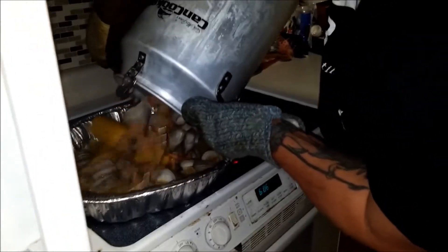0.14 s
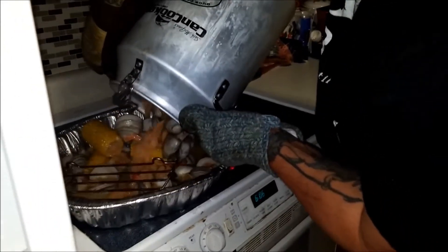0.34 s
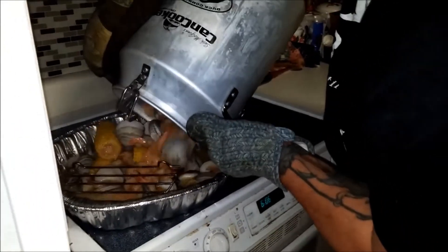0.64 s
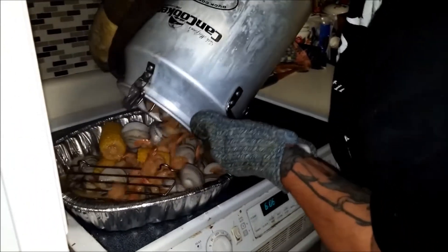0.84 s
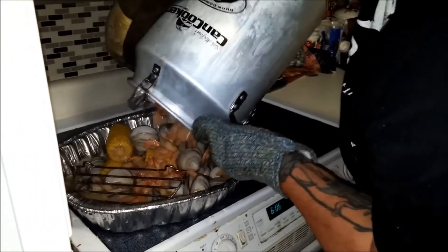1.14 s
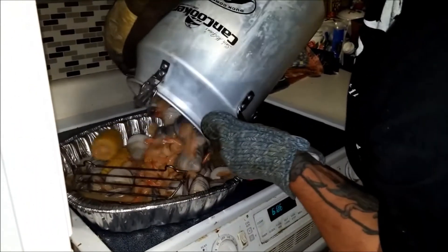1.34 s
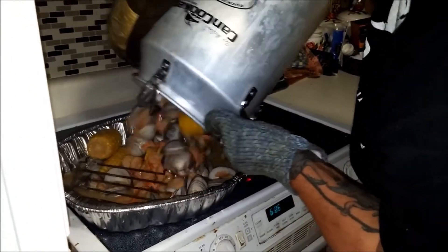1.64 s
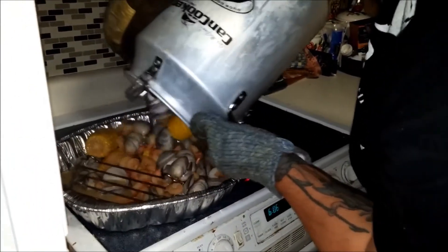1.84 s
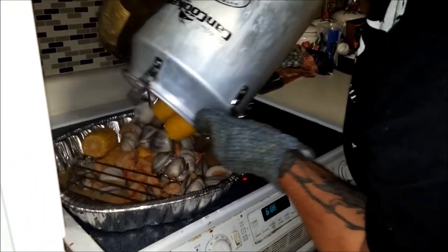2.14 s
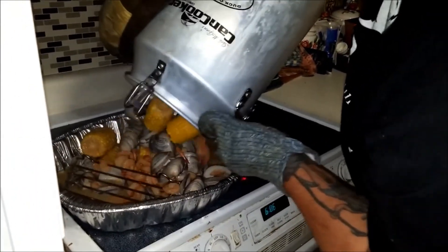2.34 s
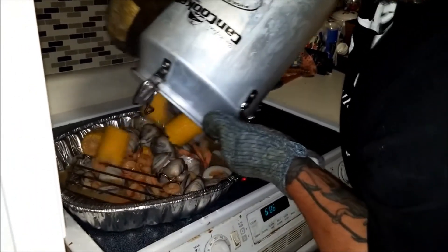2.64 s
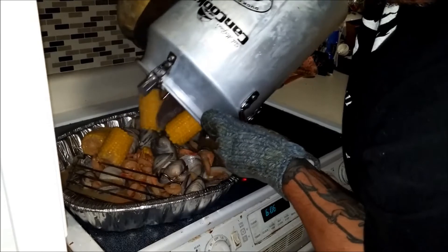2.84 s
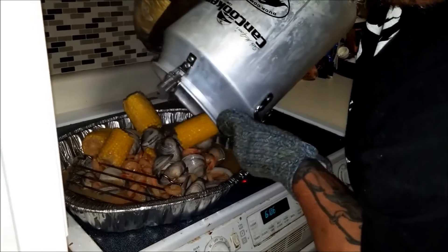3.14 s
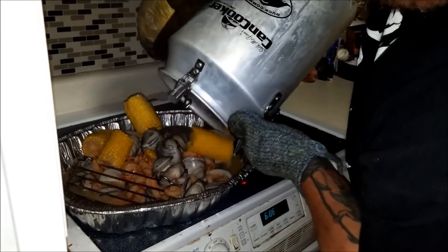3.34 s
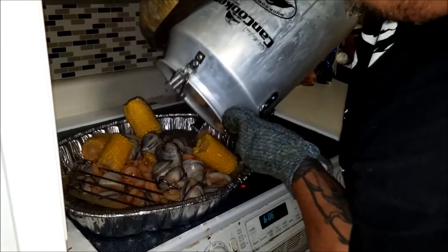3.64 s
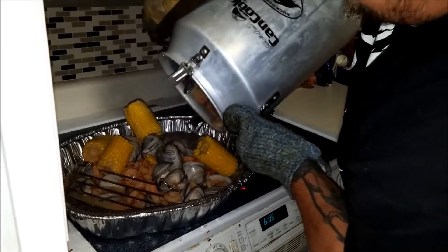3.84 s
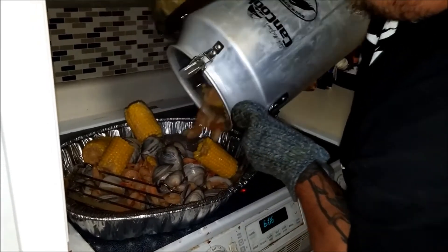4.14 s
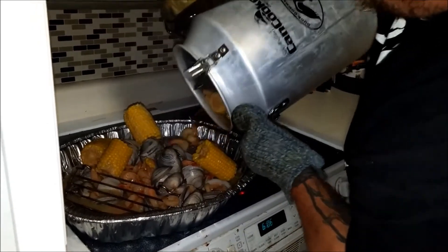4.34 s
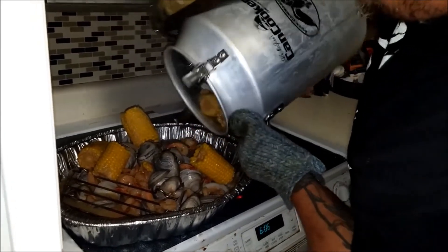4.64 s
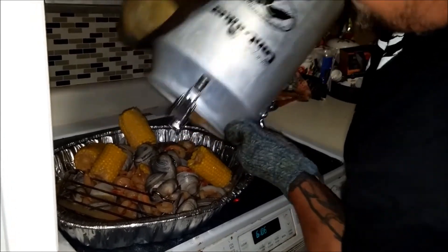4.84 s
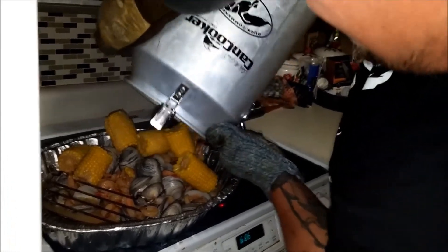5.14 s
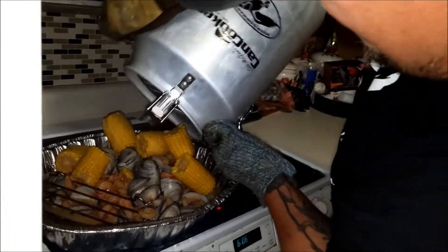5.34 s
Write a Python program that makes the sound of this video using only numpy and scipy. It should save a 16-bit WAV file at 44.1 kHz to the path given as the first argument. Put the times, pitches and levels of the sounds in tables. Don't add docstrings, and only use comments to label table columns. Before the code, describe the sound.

In a small kitchen, heard close up in stereo, a wet load of clams and corn tumbles from an aluminium pot into a foil pan. It opens with a dense rush of broth and shells, continues in uneven knocks and clacks, thins to a near lull before four seconds, then bursts into loud ringing clanks and a last spill.

```python
import sys
import numpy as np
from scipy import signal
from scipy.fft import rfft, irfft
from scipy.io import wavfile
from scipy.ndimage import uniform_filter1d

SR = 44100
rng = np.random.default_rng(int(sys.argv[2]) if len(sys.argv) > 2 else 0)


def invert_db(x):
    u = np.asarray(x, float) / 20
    return 10 ** u


def pcm_store(signal):
    levels = np.round(np.clip(np.atleast_2d(signal), -1, 1) * 32767)
    wavfile.write(sys.argv[1], SR, levels.astype(np.int16).T)


N = 242550
PADDED = 2 ** 18
HZ = np.fft.rfftfreq(PADDED, 1 / SR)

# [t/s, level/dB, f/Hz]
CLANKS = [(0.715, -21, 1770), (1.117, -16.5, 1770), (1.5661, -13.5, 1652), (1.688, -15, 1830),
          (1.744, -11.5, 1860), (1.834, -29, 1670), (2.0075, -28, 1813), (2.073, -25, 1770),
          (2.365, -33, 1700), (2.78, -18, 1870), (3.067, -16.5, 1686), (3.3743, -26, 1720),
          (3.463, -5.5, 1715), (3.9745, -9.5, 1733), (4.1408, 6, 1786), (4.3017, 2.5, 1670),
          (4.821, -13.5, 1762), (4.982, 2, 1642), (5.022, 5, 1790), (5.1697, -12, 1730)]


def on_hz(table):
    hz, value = np.transpose(table)
    return np.interp(np.log(HZ + 1), np.log(hz), value)


def unit(x):
    return x / np.sqrt(np.sum(x ** 2) / len(x))


def decay(t, t60):
    return np.exp(-np.log(1000) * t / t60)


def fade(t60, seconds):
    return decay(np.arange(int(seconds * SR)) / SR, t60)


def pair(colour, shape):
    # [f/Hz, likeness 0-1]
    likeness = [(60, 0.92), (130, 1), (290, 0.86), (640, 0.71), (1410, 0.06), (3100, 0.18), (6820, 0),
                (15000, 0.13)]
    mid, side = rfft(rng.standard_normal((2, N)) * shape, PADDED)
    alike = np.clip(on_hz(likeness), 0, 1)
    mid = mid * np.sqrt(1 + alike)
    side = side * np.sqrt(1 - alike)
    both = irfft(colour * np.array([mid + side, mid - side]), PADDED)[:, :N]
    return both / np.sqrt(2 * np.mean(colour ** 2))


def held(rate, rows):
    k = int(SR / rate)
    steps = np.repeat(rng.standard_normal((rows, N // k + 1)), k, axis=1)[:, :N]
    return 1.15 * uniform_filter1d(steps, k // 2)


def contacts(rate, scatter_db, shape, first=0):
    size_chance, sign_chance, when_chance = rng.random((3, len(shape)))
    size = invert_db(np.minimum(-scatter_db * np.log(size_chance + 1e-9), 30)) * np.sign(sign_chance - 0.5)
    clicks = size * (when_chance < rate / SR) * shape
    clicks[0] += first
    return clicks / np.sqrt(np.sum(clicks ** 2))


def crowd(drive, lo_hz, hi_hz, t60, tail_db, tail_t60):
    # [f/Hz, level/dB per Hz]
    overtones = [(21, -54), (35, -9.5), (111, -18), (171, 6.5), (279, -17), (543, -21), (1060, -12.5),
                 (1330, -17), (1770, -9.5), (3180, -21), (4110, -17), (9580, -16), (11800, -29.5),
                 (15800, -40.5)]
    power = 0
    for db, seconds in ((0, t60), (tail_db, tail_t60)):
        keep = np.exp(-2 * np.log(1000) / (seconds * SR))
        power = power + invert_db(2 * db) * signal.lfilter([1 - keep], [1, -keep], drive ** 2)
    band = np.sqrt((1 + (lo_hz / (HZ + 1)) ** 8) * (1 + (HZ / hi_hz) ** 8))
    return pair(invert_db(on_hz(overtones)) / band, np.sqrt(power))


def ring(drive, modes, place_db, lag_s, lo_hz, hi_hz):
    out = np.zeros((2, N))
    walk = held(25.0, len(modes))
    weights = invert_db(place_db * np.minimum(walk, 1))
    detunes = 0.013 * walk[:, ::-1]
    for (hz, db, t60), weight, detune in zip(modes, weights, detunes):
        turn = np.exp(2j * np.pi * hz / SR * np.cumsum(1 + detune))
        keep = np.exp(-np.log(1000) / (t60 * SR))
        gain = invert_db(db) * np.sqrt(1 - keep ** 2)
        tone = turn * signal.lfilter([gain], [1, -keep], drive * weight * turn.conj())
        lag = lag_s * rng.standard_normal((2, 1))
        out += (tone * np.exp(2j * np.pi * hz * lag)).imag
    return signal.sosfilt(signal.butter(2, [lo_hz, hi_hz], "band", fs=SR, output="sos"), out)


def clack(hz, t60, spread, glide=0):
    t, glide_s = np.arange(2048) / SR, 0.003
    chance = rng.standard_normal((4, 3))
    pitch = np.minimum(hz * (1 + spread * chance[:, :1, None]), 15000.0)
    bent = t + glide * glide_s * (1 - np.exp(-t / glide_s))
    modes = np.sum(np.sin(2 * np.pi * pitch * bent + chance[:, 1:, None] * 2), axis=0)
    return unit(modes * np.minimum(hz * t, 1) * decay(t, t60))


def strike(table, bounce_t60, first, tone_db, tone_t60, trim_db, glide=0):
    drive, tones = np.zeros((len(trim_db), N + SR)), np.zeros((2, N + SR))
    for s, *db, hz in table:
        i = int((s - 0.001) * SR)
        blow = contacts(1200.0, 3.8, fade(bounce_t60, 0.1), first)
        drive[:, i:i + len(blow)] += invert_db(np.array(db) + trim_db)[:, None] * blow
        tone = signal.fftconvolve(clack(hz, tone_t60, 0.06, glide), blow[None])
        tones[:, i:i + tone.shape[1]] += invert_db(db[-1] + tone_db) * tone
    return drive[:, :N], tones[:, :N]


def patter(surges, rise_db_s, fall_db_s, rates, surge_db):
    t, step = np.arange(0, N + 64, 64) / SR, np.arange(N) / 64
    late = t - np.array(surges)[:, :1]
    shape = invert_db(np.where(late < 0, rise_db_s * late, -fall_db_s * late))
    coarse = np.sqrt(invert_db(np.array(surges)[:, 1:].T) ** 2 @ shape ** 2)
    level = np.array([np.interp(step, np.arange(len(t)), row) for row in coarse])
    level = level * invert_db(surge_db * held(40.0, len(level)))
    return level * np.sqrt(N) * np.array([contacts(rate, 2.85, np.ones(N)) for rate in rates])


def small_shells(drive, count, lo_hz, hi_hz, t60):
    out = np.zeros((2, N + SR))
    loud = np.sqrt(uniform_filter1d(drive ** 2, size=900) + 1e-12)
    for place, pitch, size in rng.random((count, 3)):
        i = int(place * N)
        tone = clack(lo_hz * (hi_hz / lo_hz) ** pitch, t60, 0.042)
        out[:, i:i + tone.shape[1]] += loud[i] * size ** 2 * tone
    return out[:, :N]


def touches(rows, spread, glide, glide_s, rise_cycles, alike):
    out, t = np.zeros((2, N + SR)), np.arange(SR // 8) / SR
    bent = t + glide * glide_s * (1 - np.exp(-t / glide_s))
    for (s, db, hz, t60), chance in zip(rows, rng.standard_normal((len(rows), 3, 3))):
        pitch = hz * (1 + spread * np.array([-1, 0, 1]) * abs(chance[0]))
        pitch = np.minimum(pitch, 15500)[:, None, None]
        phase = (1 - alike) * chance.T[:, 1:, None] * 2
        tone = np.sin(2 * np.pi * pitch * bent + phase).sum(axis=0) / 2
        shape = np.minimum(hz * t / rise_cycles, 1) * decay(t, max(t60, 0.005))
        i = int((s - 0.001) * SR)
        out[:, i:i + len(t)] += invert_db(db) * shape * tone
    return out[:, :N]


def knocks():
    # [t/s, blow level/dB, weight/dB (boom), hardness/dB (clack)]
    landings = [(0.1041, -4.5, -35, 0), (0.2088, -2, -20, -9), (0.2301, -1, -24, -18),
                (0.3062, -18.5, -15, 8), (0.348, -3.5, -28, -11.5), (.443, -21.5, -21, 2),
                (0.6387, -8.5, -17, -16), (0.6757, -15, -27, -25), (.77, -12, -10, -7),
                (0.8921, -3.5, -14.5, -13), (0.9738, -10.5, -20, -1.5), (1.0826, -11.5, -4, -2),
                (1.256, -9, -14.5, -10.5), (1.4552, -15, -22, -9), (1.6752, -6, -16, -2.5),
                (2.2179, -7, -16.5, -8.5), (2.276, -14.5, -16, -2.5), (2.343, -18.5, -28, 0),
                (2.364, -15.5, -12, -1), (2.609, -8, -27, -2.5), (2.6841, -17.5, -25, -9),
                (2.722, -15.5, -14.5, -12), (2.7817, -10.5, -24, -15.5), (3.464, -8, -12, -4.5),
                (4.0209, -17.5, -4.5, -2.5), (4.128, -32.5, 18, 10), (4.143, -3.5, -9, 4.5),
                (4.3012, -24, -27, -20), (4.5617, -11, -7, -20), (4.6378, -12.5, -9, -5)]
    # [t/s, blow level/dB, weight/dB, hardness/dB]
    bumps = [(0.0677, -6, -29, -4), (0.147, -4.5, -32, -2), (0.7142, -6, -19.5, -13),
             (1.0021, -8, -12, -10.5), (1.114, -23, -10, 2), (1.3673, -14.5, -20, -7.5),
             (1.564, -11, -6, -5), (1.7354, -14, -3.5, -11), (1.8337, -1.5, -22.5, -11.5),
             (1.935, -8, -46, -6), (2.007, -8.5, -24, -9), (2.0539, -7.5, -9, -23), (2.0715, 0, -25, -19),
             (2.097, -0.5, -18.5, -15.5), (2.146, -11.5, -27, -12), (2.1913, -10, -20, -28),
             (2.4944, -9.5, -33, -3.5), (2.9635, -21, -15, -12), (3.0661, -17.5, -6, -12),
             (3.1339, -0.5, -27, -10.5), (3.2178, -12, -35, -6), (3.283, -19, -11, -26),
             (3.5044, -24.5, -28, -16), (4.2802, -13, -10, -22), (4.82, -15, -15, -0.5),
             (4.9624, -12, -13, -6), (4.982, 4.5, -20.5, -10), (5.0196, 2, -13.5, -6.5),
             (5.0732, -7.5, -25, -25), (5.1653, 1.5, -21, -4.5)]
    # [t/s, blow level/dB, weight/dB]
    taps = [(2.92, -36.5, 3), (0.703, -14, -22), (3.67, -24, -12), (1.2327, -49, -22), (1.345, -19.5, -15),
            (1.4107, -17, -23), (1.549, -23, -19), (2.82, -30, -29), (3.047, -35, -14), (3.256, -25, -10),
            (3.3067, -15.5, -15.5), (3.3273, -35, -18), (3.434, -22.5, -17), (3.538, -16.5, -32),
            (3.5735, -17.5, -9.5), (3.805, -34.5, -1), (3.9439, -21.5, -9.5), (3.976, -14, -26),
            (4.7893, -21, -5), (4.9203, -15, -17), (5.3419, -12, -21)]
    rows = [(*r, -4.5) for r in landings] + [(*r, -11.5) for r in bumps]
    rows += [(*r, -8.5, -20) for r in taps]
    pitches = 4320 * np.exp(0.14 * rng.standard_normal(len(rows)))
    hits = [(s, db, db + weight, db + heap, db + hard, hz)
            for (s, db, weight, hard, heap), hz in zip(rows, pitches)]
    trim_db = np.array([19.9, 28.8, 23.8, 23.64])
    return strike(hits, 0.11, 3.3, 19.5, 0.091, trim_db, glide=0.3)


def tumbling_load():
    # [peak t/s, flow level/dB, scrape on the wall/dB, hardness/dB]
    surges = [(0.0, -12, 2, -3), (.13, -16.5, -16, -17), (.29, -15.5, -3, -3), (.44, -25, 2, -17),
              (.84, -33, 8, 9), (1.059, -29.5, 6, 3.5), (1.35, -37.5, 6, -8), (1.55, -33.5, 0, -4),
              (1.74, -19.5, 2.5, 1.5), (1.9, -29.5, -1, 2.5), (2.1, -23, -5, -4), (2.24, -34, -15, -12),
              (2.37, -29.5, 9.5, -1), (2.511, -31.5, -15, 6.5), (2.66, -31.5, 11, -17),
              (3.03, -33.5, 1, -24), (3.189, -24, 3.5, 2.5), (3.58, -34.5, -3, -9), (3.72, -46, 1.5, -2),
              (3.82, -46.5, -5, -16), (4.16, -27, -12, -1), (4.322, -13.5, 0.5, 3), (4.47, -28.5, 2.5, -11),
              (4.6, -24.5, -1, 2.5), (4.76, -30, -15, 0.5), (5.05, -17, 2.5, 1), (5.148, -27, 7.5, 5)]
    slips = [(s, db + wall, db - 6.5, db, db + hard) for s, db, wall, hard in surges]
    return patter(slips, 125.5, 117, (1237.0, 490.0, 868.0, 3160.0), 2.17)


def pot(wall, air):
    # [f/Hz, level/dB, t60/s]
    wall_modes = [(1649, 3, 0.11), (1685, -15.5, 0.14), (1733, 9.5, 0.1), (1796, 0, 0.18),
                  (1830, -10.5, 0.19), (1950, -30, 0.04), (2130, -31, 0.023), (2470, -10, 0.048),
                  (2552, -2.5, 0.07)]
    # [f/Hz, level/dB, t60/s]
    air_modes = [(170.6, -1, 0.18), (198, -5, 0.17), (222, -6.5, 0.37)]
    # [f/Hz, level/dB, t60/s]
    belly_modes = [(1060, 9, .15)]
    clanks, dings = strike(CLANKS, 0.04, 2.1, 17.0, 0.071, np.array([16.0]))
    out = ring(clanks[0] + invert_db(-15.0) * wall, wall_modes, 7.7, 0.00011, 1520.0, 2500.0) + dings
    out += invert_db(-1.0) * ring(air, air_modes, 4.8, 0.000096, 114.0, 340.0)
    out += invert_db(-1.0) * crowd(wall, 810, 2780, 0.073, -2.8, 0.3)
    out += invert_db(-5.5) * crowd(air, 170, 250, 0.16, -4.5, 0.26)
    free = invert_db(-20 * abs(np.arange(N) / SR - 4.2))
    return out + yelps() + ring(wall * free, belly_modes, 2.4, 0.0001, 600.0, 1600.0)


def yelps():
    out, t = np.zeros((2, N + SR)), np.arange(SR // 5) / SR
    bend = 1 + 0.3 * np.exp(-t / 0.004)
    shape = (1 - np.exp(-t / 0.0012)) * fade(0.14, 1 / 5)
    for (s, db, hz), turn in zip(CLANKS, rng.standard_normal((len(CLANKS), 2))):
        phase = 2 * np.pi * np.cumsum(hz * bend) / SR
        i = int(s * SR)
        out[:, i:i + len(t)] += invert_db(db + 0.1) * shape * np.sin(phase + 1.3 * turn[:, None])
    return out[:, :N]


def pile(heap, heap_stream):
    # [f/Hz, level/dB, t60/s]
    heap_modes = [(419, -7.5, 0.27), (641.4, -6, 0.38), (789, 2.5, 0.13), (909, 6, 0.03), (1002, -2, 0.17),
                  (1061, 1.5, 0.33)]
    out = invert_db(-10.0) * ring(heap, heap_modes, 9.2, 0.00008, 348.0, 1170.0)
    out += invert_db(-3.0) * crowd(heap, 348, 1315, 0.5, 0.0, 0.39)
    return out + invert_db(29.5) * small_shells(heap_stream, count=260, lo_hz=440.0, hi_hz=2406.0, t60=0.065)


def cobs():
    # [t/s, level/dB, starting f/Hz]
    drops = [
        (0.48, -13.5, 274.5),
        (2.047, -11, 181),
        (4.426, -9.5, 189.6),
        (4.468, -8.5, 153),
    ]
    out, t = np.zeros(N + SR), np.arange(SR // 5) / SR
    sag = 0.475 + 0.52 * np.exp(-t / 0.043)
    for s, db, hz in drops:
        wobble = uniform_filter1d(rng.standard_normal(len(t)), size=150)
        phase = 2 * np.pi * np.cumsum(hz * sag * (1 + 6.9 * wobble)) / SR
        i = int(s * SR)
        out[i:i + len(t)] += invert_db(db + 0.39) * np.sin(phase) * fade(0.28, 1 / 5)
    return out[:N]


def shells(shell):
    out = invert_db(-3.0) * crowd(shell, 1970, 4860, 0.21, 0.46, 0.33)
    return out + invert_db(24.0) * small_shells(shell, count=330, lo_hz=2204.0, hi_hz=9450.0, t60=0.018)


def rim(drive):
    # [f/Hz, level/dB, t60/s]
    rim_modes = [(4154, 0, 0.035), (5006, -3, 0.03), (5230, -14, 0.033), (6570, -10, 0.076),
                 (8380, -10, 0.074)]
    return invert_db(-11) * ring(drive, rim_modes, 7.0, 0.000303, 3000.0, 13000.0)


def cracks():
    # [t/s, level/dB, f/Hz, t60/s]
    first_touches = [(0.21, -3, 791, 0.035), (0.587, -23, 1750, 0.035), (0.639, -9, 950, 0.035),
                     (0.714, -9, 1790, 0.035), (0.891, -4, 1200, 0.035), (1.082, -10, 1670, 0.035),
                     (1.232, -13, 1740, 0.035), (1.256, -8, 1040, 0.035), (1.367, -16, 1760, 0.035),
                     (1.549, -15, 1490, 0.035), (1.564, -10, 1660, 0.035), (1.679, -6, 1960, 0.035),
                     (1.833, -7, 1700, 0.035), (1.936, -10, 2310, 0.035), (2.006, -11, 1770, 0.035),
                     (2.049, -10, 810, 0.035), (2.072, -4, 1740, 0.035), (2.219, -7, 748, 0.035),
                     (2.275, -11, 1040, 0.035), (2.343, -13, 1770, 0.035), (2.493, -11, 2280, 0.035),
                     (2.609, -8, 791, 0.035), (2.781, -12, 1050, 0.035), (2.969, -21, 910, 0.035),
                     (3.022, -24, 1760, 0.035), (3.064, -15, 1800, 0.035), (3.133, -3, 1760, 0.035),
                     (3.461, -4, 1780, 0.035), (3.646, -25, 867, 0.035), (3.803, -31, 1070, 0.035),
                     (3.908, -46, 934, 0.035), (3.945, -24, 1070, 0.035), (3.976, -9, 1730, 0.035),
                     (4.021, -16, 1060, 0.035), (4.127, -3, 1080, 0.035), (4.141, -2, 1740, 0.035),
                     (4.279, -3, 1050, 0.035), (4.3, -1, 1730, 0.035), (4.562, -10, 1650, 0.035),
                     (4.824, -10, 1710, 0.035), (4.918, -22, 894, 0.035), (4.963, -3, 1640, 0.035),
                     (4.98, -1, 1630, 0.035), (5.019, -2, 1750, 0.035), (5.155, -4, 797, 0.035),
                     (5.166, -2, 1750, 0.035), (5.34, -13, 1620, 0.035)]
    return invert_db(-5.0) * touches(first_touches, 0.13, 0.7, 0.002, 0.4, 0.7)


def glugs():
    # [t/s, level/dB, f/Hz]
    gulps = [(0.21, -12, 780), (0.343, -0.5, 505), (0.434, -24, 830), (0.476, -11, 258), (0.637, -26, 890),
             (0.778, -12, 640), (0.894, -13, 736), (1.003, -18, 797), (1.255, -27, 890), (1.454, -25, 860),
             (1.55, -32, 759), (1.642, -17, 794), (1.682, -13, 806), (1.939, -18, 821), (2.046, -17, 253),
             (2.14, -15, 776), (2.217, -18, 765), (2.336, -24, 899), (2.375, -10.5, 910), (2.492, -30, 880),
             (2.609, -22, 800), (2.673, -19, 778), (2.777, -16, 877), (3.138, -16, 810), (3.435, -23, 480),
             (3.46, -13, 860), (3.803, -27, 797), (3.943, -28, 790), (3.971, -18, 890), (4.021, -18, 786),
             (4.138, -4, 920), (4.17, -1.5, 795), (4.276, -12, 870), (4.335, -20, 781), (4.57, -10, 620),
             (4.915, -28, 759), (4.977, -16, 781), (5.016, -14, 850), (5.153, -22, 765), (5.339, -36, 859)]
    return invert_db(-9.0) * touches([(*r, 0.1) for r in gulps], 0.05, -0.2, 0.015, 2.0, 0.8)


def splashes():
    # [peak t/s, low gush level/dB, spray level/dB]
    pours = [(0.0, -25, -23.5), (.08, -30.5, -52), (.26, -29, -29.5), (.5, -30.5, -79), (.93, -44, -33.5),
             (1.07, -37, -62), (1.4, -50, -47), (1.78, -31.5, -34), (2.06, -37, -38), (2.3, -37.5, -42),
             (2.54, -35, -63), (2.78, -41, -55), (3.12, -37.5, -67), (3.29, -42, -60), (3.7, -48, -59),
             (4.14, -45, -57), (4.29, -83, -22.5), (4.47, -24.5, -57), (4.63, -29.5, -37.5),
             (5.16, -38, -33.5), (5.45, -46.5, -61)]
    return patter(pours, 117, 119, (400.0, 5000.0), np.array([[1.0], [4.5]]))


def foil_snaps():
    # [t/s, level/dB, f/Hz]
    snap_hits = [(0.1037, -25, 8840), (0.1461, -21, 10400), (0.2089, -22, 8280), (0.29, -18.5, 9700),
                 (0.3217, -18, 8500), (0.7716, -14.5, 9020), (0.846, -19, 9670), (0.8922, -16, 8830),
                 (1.366, -28, 6380), (1.6746, -6.5, 6620), (1.7327, -12.5, 6530), (1.7878, -21, 8300),
                 (1.828, -11.5, 8930), (2.0956, -21, 8450), (2.276, -19, 8930), (2.396, -19.5, 8200),
                 (2.4942, -19, 8450), (2.5087, -18, 7960), (3.1303, -6, 8460), (3.2184, -25, 8500),
                 (3.3059, -22.5, 8800), (3.4606, -20, 6500), (3.5722, -31, 9300), (3.9779, -27.5, 6860),
                 (4.14, -15, 7000), (4.2253, -26, 8650), (4.3004, -10, 9440), (4.9806, -9, 9600),
                 (5.0268, -5, 7650), (5.1596, -12, 10080)]
    return strike(snap_hits, 0.11, 3.0, 19.2, 0.13, np.array([22.0]))


def broth(gush, hiss):
    out = invert_db(3.0) * crowd(gush, 48, 96.4, 0.12, -3.2, 0.28)
    return out + crowd(hiss, 4150, 25200, 0.041, -0.87, 0.32)


def ticks():
    # [t/s, level/dB, f/Hz]
    foil_ticks = [(0.2089, -28, 11600), (0.7038, -42, 11800), (0.7716, -34, 13300), (1.6731, -21, 12200),
                  (2.0921, -30, 11400), (2.4897, -35, 14100), (2.5102, -28, 14200), (2.8, -27, 14800),
                  (3.1293, -27, 11500), (3.2191, -25, 13800), (3.3039, -35.5, 13800), (4.2956, -25, 15300),
                  (4.9157, -42, 12700), (5.3507, -23, 11100)]
    return invert_db(-4.0) * touches([(*r, 0.035) for r in foil_ticks], 0.04, 0.06, 0.003, 3.0, 0.1)


def kitchen():
    # [f/Hz, level/dB per Hz]
    room_colour = [(18, -38), (30, 4.5), (186, -12), (563, 9), (941, 21), (1530, -50), (2990, -5),
                   (9000, -23), (15500, -35)]
    return invert_db(-72) * pair(invert_db(on_hz(room_colour)), 0.92)


def scene():
    hits, clacks = knocks()
    stream = tumbling_load()
    wall, air, heap, shell = hits + stream
    gush, spray = splashes()
    snaps, pings = foil_snaps()
    bright = spray + snaps[0]
    out = clacks + pot(wall, air) + pile(heap, stream[2]) + cobs()
    out += shells(shell) + rim(shell + bright) + cracks() + glugs()
    out += broth(gush, bright + invert_db(-13) * hits[3]) + pings + ticks()
    return out + kitchen()


def thin_treble(x):
    hz, _, cells = signal.stft(x, SR, nperseg=2048)
    chance = np.repeat(rng.random((len(hz) // 6 + 1, cells.shape[2] // 2 + 1)), 6, axis=0)
    chance = np.repeat(chance, 2, axis=1)[:len(hz), :cells.shape[2]]
    share = np.clip((hz[:, None] - 10500) / 1000 * 0.11, 0, 0.6)
    kept = cells * (chance > share) / np.sqrt(1 - share)
    return signal.istft(kept, SR, nperseg=2048)[1][:, :N]


def roll_off(x):
    return signal.sosfilt(signal.butter(12, 16150, fs=SR, output="sos"), x)


def record(dry):
    # [f/Hz, left minus right/dB]
    port_balance = [(60, 4), (110, -1), (200, 0.5), (380, 0.5), (700, 0.5), (1290, -1), (2380, 0.5),
                    (4400, -4), (8120, -6.5), (15000, -19.5)]
    lean = on_hz(port_balance) / 2
    drift = (-0.5 + 0.28 * np.arange(N) / SR) / 2
    dry = dry * invert_db(np.array([drift, -drift]))
    loud = np.sqrt(uniform_filter1d(np.mean(dry ** 2, axis=0), int(0.02 * SR)) + 1e-12)
    dry = dry * np.minimum(loud / invert_db(-38.5), 1) ** 0.68
    shaded = irfft(rfft(dry, PADDED) * invert_db(np.array([lean, -lean])), PADDED)
    rounded = np.tanh(0.94 * shaded) / 1.478
    band = (HZ < 15900) / (1 + (45 / (HZ + 1)) ** 4)
    mix = thin_treble(irfft(rfft(rounded) * band, PADDED)[:, :N])
    return roll_off(mix)


dry = scene()
out = record(dry)
pcm_store(out)
```